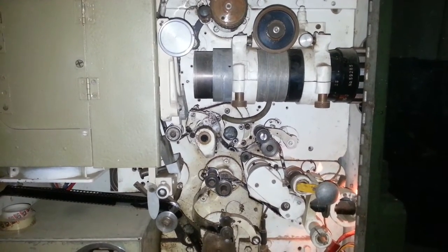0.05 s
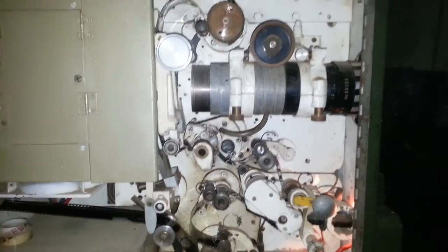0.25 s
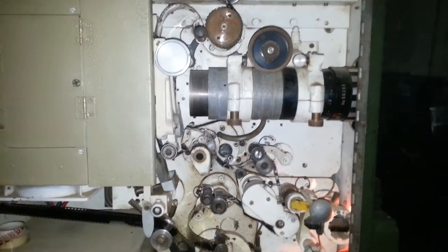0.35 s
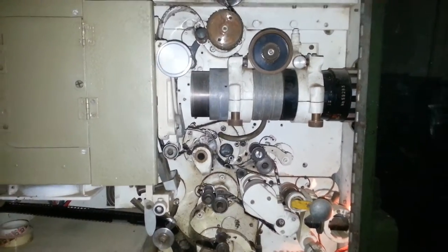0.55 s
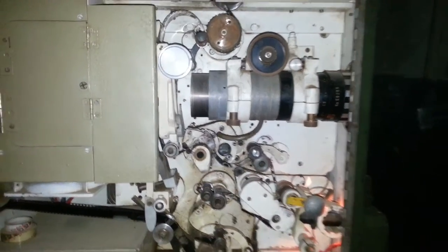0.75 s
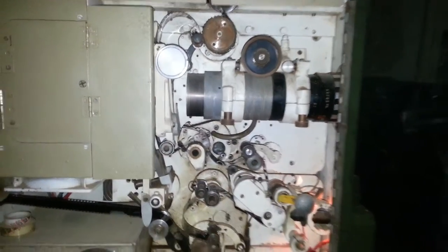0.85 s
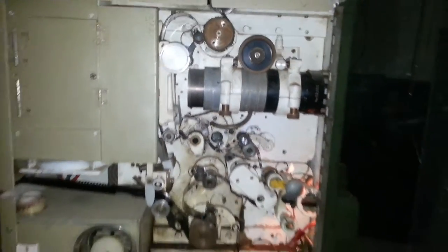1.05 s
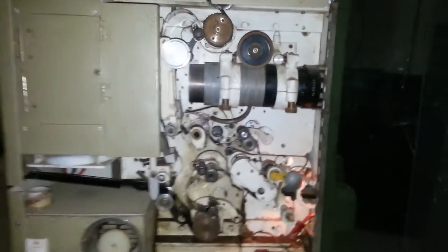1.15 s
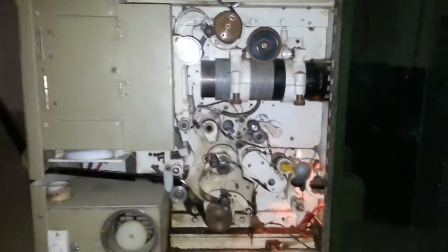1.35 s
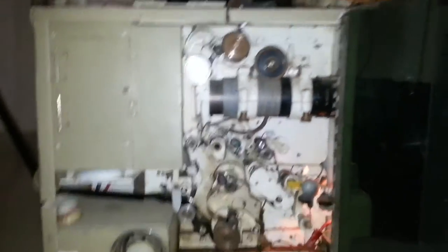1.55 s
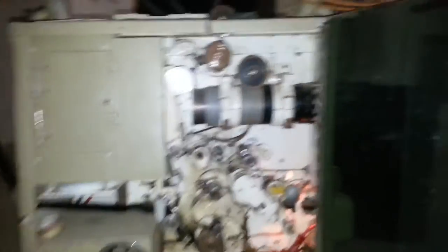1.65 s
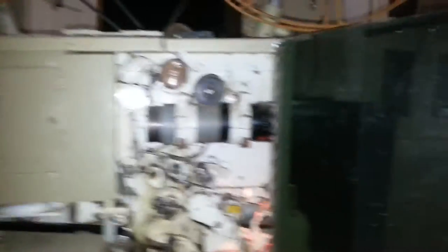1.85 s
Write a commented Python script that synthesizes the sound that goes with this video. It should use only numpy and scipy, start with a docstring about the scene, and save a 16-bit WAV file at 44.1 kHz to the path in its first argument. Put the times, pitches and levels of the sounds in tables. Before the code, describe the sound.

Handling noise starts at about 0.15 seconds with small ticks, then a finger scrapes the right side of the microphone in two strokes and a flick until 0.6 seconds. Faint ticks follow near 1.1 and 1.3 seconds. Around 1.6 seconds a hand brushes both sides with soft, dull bumps. Throughout, a film projector's quiet low hum and thin, wavering high whine sit over soft room rumble and hiss.

```python
"""Handling noise beside a film projector

A quiet room, a hand-held stereo recorder moving about a hand-built film projector. Right on the
microphone, a finger ticks and scrapes over the right port; then the hand brushes both ports and bumps
the case. Further off are a low hum, rumble, soft hiss and a thin whine that swells and fades as each
port moves through its standing waves."""
import sys
import numpy as np
from scipy import signal
from scipy.fft import rfft, irfft
from scipy.io import wavfile
from scipy.ndimage import uniform_filter1d

SR = 44100
rng = np.random.default_rng(int(sys.argv[2]) if len(sys.argv) > 2 else 0)


def file_out(sig):
    """Save sig as 16-bit WAV at sys.argv[1]."""
    # one column per channel
    cols = np.atleast_2d(sig).T
    # limit, then scale
    lim = np.clip(cols, -1, 1)
    pcm = np.round(lim * 32767).astype(np.int16)
    wavfile.write(sys.argv[1], SR, pcm)


N = 83790
TIME = np.arange(N) / SR

# Colour of the room tone: frequency_hz, relative_db
RUMBLE_COLOUR = [(20, -48), (45, -40), (80, -2), (130, 0), (230, 1.5), (300, 0), (400, -8), (600, -16),
                 (1000, -22.5), (2500, -40.5), (6000, -75)]
HISS_COLOUR = [(200, 10), (1200, -0.5), (2500, -1.5), (3600, -1), (5200, 5.5), (6800, -0.5), (9000, -3),
               (11700, -5.5), (12800, -20), (15000, -45)]
# Rise and fall of the rumble, the hiss and the lowest hum tone: time_s, gain_db
RUMBLE_SWELL = [(0, -4.5), (0.1, 3.5), (0.2, 3.5), (0.38, -1.5), (0.5, 5), (0.62, 2), (0.69, -5.5),
                (0.76, 3), (0.86, -6.5), (0.93, 4), (1.02, -6), (1.2, 1), (1.35, 2), (1.45, -1),
                (1.62, -3.5), (1.77, 3), (1.9, -8)]
HISS_LEVEL = [(0, -57), (0.3, -51), (0.55, -52.5), (0.7, -56), (1.08, -49), (1.3, -51), (1.45, -53.5),
              (1.6, -45.5), (1.82, -54.5), (1.9, -48.5)]
HUM_SWELL = [(0, -5.5), (0.8, -7), (1.05, 5), (1.42, -1.5), (1.6, 10.5), (1.9, 1.5)]
# Tones of the projector's hum: pitch_hz, level_db, waver_ratio
HUM_TONES = [(129.8, -57.5, 0), (172.3, -59.5, 1.2), (283, -60, 1.3)]
# Standing waves of the whine as each port meets them: time_s, relative_db
WHINE_LEFT = [(0.01, -41), (0.21, -40), (0.29, -47), (0.4, -45), (0.71, -38), (0.77, -41), (0.8, -55),
              (0.88, -38), (0.92, -49), (0.97, -36), (1.0, -46), (1.05, -37), (1.08, -57), (1.11, -39),
              (1.14, -39), (1.18, -62), (1.32, -40), (1.37, -53), (1.42, -37), (1.6, -43), (1.65, -37),
              (1.69, -46), (1.74, -38), (1.89, -47)]
WHINE_RIGHT = [(0.01, -45), (0.18, -41), (0.23, -53), (0.25, -41), (0.27, -48), (0.33, -37), (0.48, -35),
               (0.76, -47), (0.8, -58), (0.87, -41), (1.0, -45), (1.04, -39), (1.08, -46), (1.11, -35),
               (1.14, -35), (1.18, -53), (1.2, -39), (1.26, -34), (1.33, -44), (1.43, -39), (1.48, -64),
               (1.58, -40), (1.77, -50), (1.89, -44)]
# Pushes of the grip on the case: centre_s, level_db, half_width_s, left_minus_right_db
BUMPS = [(0.201, -47, 0.019, -14), (0.264, -61, 0.017, -22), (0.615, -50.5, 0.021, 3),
         (1.548, -46.5, 0.04, -5.5), (1.642, -49.5, 0.019, -15), (1.753, -48, 0.004, 3)]
# Colour of those thuds: frequency_hz, relative_db
BUMP_COLOUR = [(20, -26), (50, -4), (110, -1.5), (250, 3.5), (500, -6), (1200, -13.5), (4000, -57)]
# Resonances of the case: pitch_hz, level_db, decay_s
CASE_MODES = [(170, -30, .004), (330, -24, 0.0035), (840, -23.5, 0.00063), (1710, -14.5, 0.0003)]
# Rubbing effort of the hand on each port and the finger on the right one: time_s, relative_db
BRUSH_LEFT_EFFORT = [(1.49, -83), (1.53, -40), (1.57, -60), (1.6, -50), (1.63, -24.5), (1.645, -16.5),
                     (1.662, -39.5), (1.7, -77)]
BRUSH_RIGHT_EFFORT = [(1.5, -77), (1.527, -39), (1.555, -52), (1.57, -36.5), (1.603, -53), (1.625, -27.5),
                      (1.646, -27), (1.665, -41), (1.7, -80)]
FIRST_STROKE = [(0.15, -69), (0.18, -39.5), (0.186, -34.5), (0.216, -30), (0.23, -45.5), (0.262, -17),
                (0.278, -16), (0.294, -27.5), (0.3, -21), (0.33, -25.5), (0.39, -62)]
SECOND_STROKE = [(0.39, -78), (0.428, -34), (0.446, -41), (0.482, -27), (0.5, -29), (0.52, -20.5),
                 (0.546, -32.5), (0.558, -24.5), (0.59, -53.5)]
FLICK = [(0.59, -60), (0.598, -56), (0.606, -30), (0.616, -22), (0.628, -27), (0.642, -57.5), (0.67, -68)]
# Colour of skin rubbing on a port: frequency_hz, relative_db
BRUSH_LEFT_COLOUR = [(100, -29), (1500, -28), (2600, -15), (4600, 0), (6500, 2), (9000, -5), (13500, -12.5),
                     (15000, -37)]
BRUSH_RIGHT_COLOUR = [(100, 7), (1000, -5.5), (2200, 1.5), (2600, 5.5), (3000, -13), (4700, 5.5),
                      (7000, 2.5), (9000, -3), (11000, -23), (13500, -42)]
GRAZE_COLOUR = [(60, -20), (300, 7), (900, 0.5), (3000, 0.5), (6500, 2), (9000, -12.5), (12000, -6),
                (13500, -40)]
FIRM_RUB_COLOUR = [(40, -28), (200, -15), (750, -13.5), (1500, -8.5), (2400, -6.5), (3000, -2.5), (3300, 1),
                   (3700, -2.5), (4600, -5.5), (6200, 0), (8000, -10), (10000, -19), (12400, -25),
                   (13200, -55)]
LIGHT_RUB_COLOUR = [(40, -22), (200, -15.5), (700, -12.5), (1600, -9), (3400, -2), (4600, -4), (6000, 0),
                    (7800, -7), (10000, -17), (12400, -17.5), (13800, -26)]
# Light grazes after a touch: start_s, level_db, decay_s
GRAZES = [(0.141, -34, .012), (1.086, -35.5, 0.01), (1.27, -37, 0.0049), (1.281, -38, 0.012),
          (1.749, -45.5, 0.019)]
# Skin catching and letting go: start_s, relative_peak_db, ring_hz
TICKS = [(0.1402, -9, 1900), (0.1683, -11, 4600), (0.1731, -13, 4500), (0.1788, -8, 4700),
         (0.1811, -11, 3900), (0.1929, -10, 4300), (0.2149, 1, 6800), (0.2997, -5, 4600),
         (0.5247, -4, 4600), (0.6085, -4, 5500), (0.7672, -29, 3000), (1.0643, -23, 5500),
         (1.084, -18, 5000), (1.2708, -20, 2900), (1.2813, -11, 7400), (1.283, -21, 3400),
         (1.5219, -20, 4300), (1.5674, -18, 4900), (1.7545, -32, 1200)]


def from_db(db):
    """Decibels to gain."""
    return 10 ** (np.asarray(db) / 20)


def unit_power(x):
    """Scale to a mean square of one."""
    return x / np.sqrt(np.mean(x ** 2) + 1e-20)


def gesture_curve(rows):
    """Gain over time from time_s, level_db rows; silent outside them."""
    return from_db(np.interp(TIME, *np.transpose(rows), left=-200, right=-200))


def level_curve(rows):
    """Gain over time from time_s, level_db rows; the ends are held."""
    return from_db(np.interp(TIME, *np.transpose(rows)))


def coloured(x, colour):
    """Shape a signal by frequency_hz, relative_db rows; unit power."""
    hz, db = np.transpose(colour)
    bins_hz = np.maximum(np.fft.rfftfreq(N, 1 / SR), 1)
    gain = from_db(np.interp(np.log(bins_hz), np.log(hz), db))
    return unit_power(irfft(rfft(x) * gain, N))


def drift(rate_hz):
    """A random wander of unit power, mostly slower than rate_hz."""
    lowpass = np.exp(-0.5 * (np.fft.rfftfreq(N, 1 / SR) / rate_hz) ** 2)
    return unit_power(irfft(rfft(rng.standard_normal(N)) * lowpass, N))


def room_tone(rumble_db=-51, likeness=0.96):
    """All around the microphone: rumble much alike in both ports, under a soft wide hiss."""
    mid, side = rng.standard_normal((2, N))
    pair = np.sqrt(1 + likeness) * mid + np.sqrt(1 - likeness) * side * [[1], [-1]]
    rumble = from_db(rumble_db) * level_curve(RUMBLE_SWELL) * coloured(pair, RUMBLE_COLOUR)
    hiss = level_curve(HISS_LEVEL) * coloured(rng.standard_normal((2, N)), HISS_COLOUR)
    return rumble + hiss


def projector_hum(waver_hz=6.1):
    """Low machine tones: the upper ones waver in strength, the lowest swells as the recorder moves."""
    tones = []
    for hz, db, waver in HUM_TONES:
        strength = from_db(db) * (1 + waver * drift(waver_hz)) / np.hypot(1, waver)
        tones.append(strength * np.sin(2 * np.pi * (hz * TIME + rng.random())))
    return np.sqrt(2) * (level_curve(HUM_SWELL) * tones[0] + sum(tones[1:]))


def projector_whine(pitch_hz=12827.3, doppler_hz=3, gain_db=3.5, swing_s=1.4):
    """One high tone reaches the ports a quarter cycle apart; each port passes its own nodes."""
    phase = 2 * np.pi * np.cumsum(pitch_hz + doppler_hz * drift(rate_hz=11)) / SR
    ports = np.transpose(WHINE_LEFT), np.transpose(WHINE_RIGHT)
    standing_waves = [np.interp(TIME, time_s, from_db(db + gain_db)) for time_s, db in ports]
    depth_db = np.where(TIME < swing_s, 1.85, 2.5)  # deeper flutter once the recorder swings away
    flutter = from_db(depth_db * np.array([drift(rate_hz=42) for _ in ports]))
    strength = uniform_filter1d(flutter * standing_waves, SR // 100)  # smoothed over 10 ms
    return np.sqrt(2) * strength * [np.sin(phase), np.cos(phase)]


def grip_bumps():
    """Dull thuds reach the microphone through the case as the grip shifts."""
    push = np.zeros((2, N))
    for centre_s, db, half_width_s, balance_db in BUMPS:
        port_gains = from_db([[db + balance_db / 2], [db - balance_db / 2]])
        push += port_gains * np.exp(-0.5 * ((TIME - centre_s) / half_width_s) ** 2)
    return push * coloured(rng.standard_normal(N), BUMP_COLOUR)


def case_knock(start_s=0.1402):
    """The case gives a few damped swings as the finger first lands."""
    age = np.maximum(TIME - start_s, 0)
    return sum(from_db(db) * np.exp(-age / decay_s) * np.sin(2 * np.pi * hz * age)
               for hz, db, decay_s in CASE_MODES)


def skin_friction(colour, slips_per_s=9000, spread_db=1, smooth_share=0.4):
    """Dense tiny slips of uneven size on smooth friction noise, coloured by the port."""
    slips = (rng.random(N) < slips_per_s / SR) * rng.choice([-1, 1], N)
    sizes = from_db(-spread_db * np.minimum(rng.exponential(1, N), 4))
    rough = np.sqrt(1 - smooth_share) * unit_power(slips * sizes)
    smooth = np.sqrt(smooth_share) * rng.standard_normal(N)
    return coloured(rough + smooth, colour)


def rub(effort, colour, gain_db):
    """One pass of skin over a port: the friction noise follows the effort."""
    return from_db(gain_db) * gesture_curve(effort) * skin_friction(colour)


def hand_brush():
    """The hand passes over both ports, each with its own friction."""
    return np.array([rub(BRUSH_LEFT_EFFORT, BRUSH_LEFT_COLOUR, gain_db=-1.5),
                     rub(BRUSH_RIGHT_EFFORT, BRUSH_RIGHT_COLOUR, gain_db=-0.5)])


def finger_grazes():
    """Brief rubs on the port that die away after a touch."""
    effort = sum(from_db(db) * (TIME >= start_s) * np.exp(-np.abs(TIME - start_s) / decay_s)
                 for start_s, db, decay_s in GRAZES)
    return effort * skin_friction(GRAZE_COLOUR)


def finger_ticks(gain_db=-0.5, port_q=1.28, trail_db=-13, trail_decay_s=0.00042, above_ring_hz=4100):
    """Each catch of the skin is a soft pulse trailed by tiny slips; it rings briefly in the port."""
    track = np.zeros(N + SR)
    age = np.arange(256) / SR
    for start_s, db, ring_hz in TICKS:
        trail = from_db(trail_db) * np.exp(-age / trail_decay_s) * rng.standard_normal(len(age))
        pulse = (age == 0) + trail
        ring = signal.lfilter(*signal.iirpeak(ring_hz, port_q, fs=SR), pulse)
        soften = signal.butter(4, min(ring_hz + above_ring_hz, 12000), fs=SR, output="sos")
        tick = signal.sosfilt(soften, ring)
        start = int(start_s * SR)
        track[start:start + len(tick)] += from_db(db + gain_db) * tick / np.abs(tick).max()
    return track[:N]


def finger_scrapes():
    """Right on the port: a firm stroke, a lighter one and a short flick."""
    return (rub(FIRST_STROKE, FIRM_RUB_COLOUR, gain_db=6)
            + rub(SECOND_STROKE, LIGHT_RUB_COLOUR, gain_db=5)
            + rub(FLICK, LIGHT_RUB_COLOUR, gain_db=6.5))


def scene(leak_db=-57):
    """Finger and hand on the recorder, with the projector and the room behind."""
    finger = finger_scrapes() + finger_ticks() + case_knock() + finger_grazes()
    on_right_port = from_db([[leak_db], [0]])  # only a trace reaches the left
    handling = finger * on_right_port + hand_brush() + grip_bumps()
    return handling + projector_whine() + projector_hum() + room_tone()


def record(dry, low_cut_hz=47, overload=0.9, stopband_hz=15200):
    """The recorder cuts the lowest rumble, clips any peak past overload and removes the top."""
    low_cut = signal.butter(2, low_cut_hz, "high", fs=SR)
    high_cut = signal.cheby2(18, 95, stopband_hz, fs=SR, output="sos")
    clipped = np.clip(signal.lfilter(*low_cut, dry), -overload, overload)
    return signal.sosfilt(high_cut, clipped)


dry = scene()
out = record(dry)
file_out(out)
```